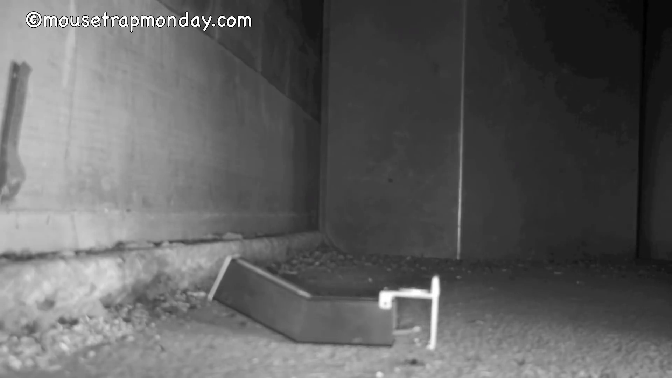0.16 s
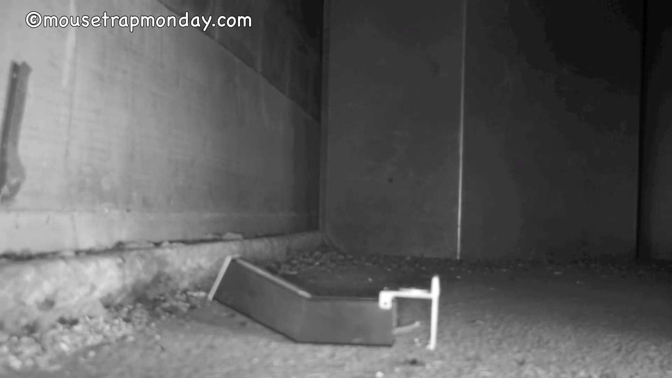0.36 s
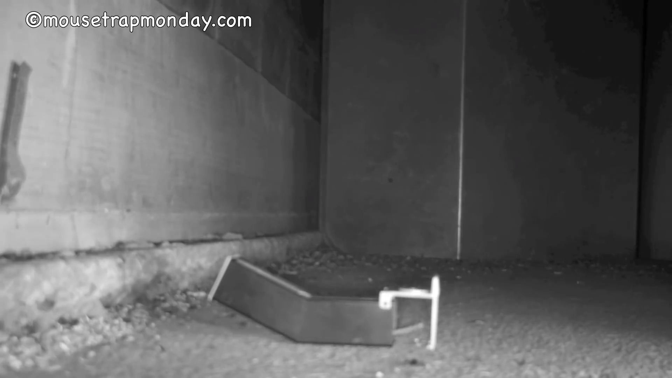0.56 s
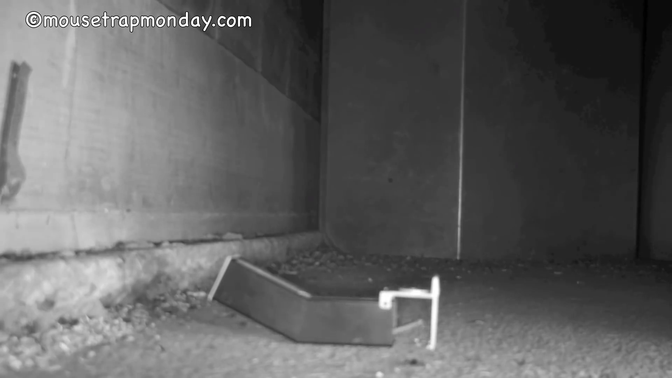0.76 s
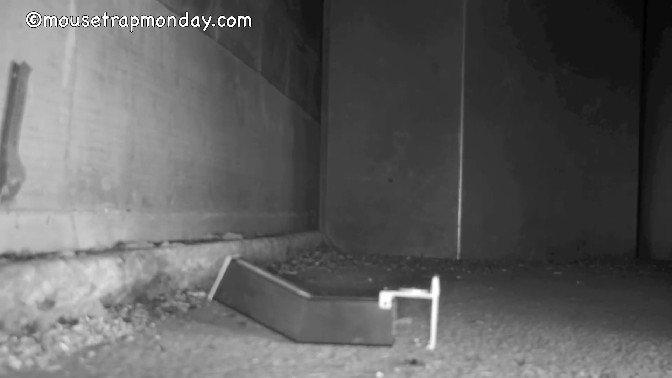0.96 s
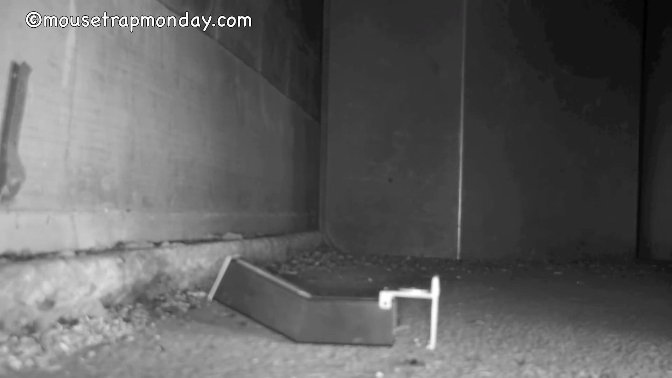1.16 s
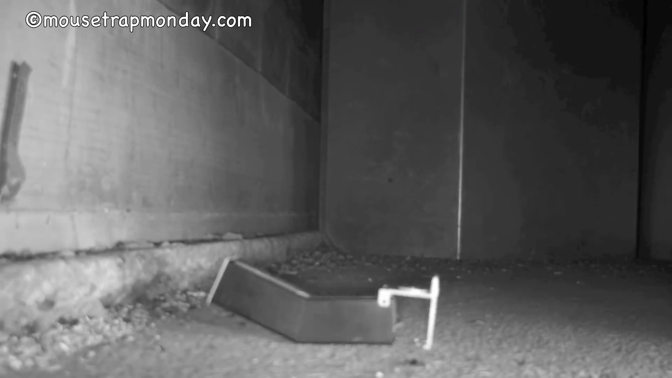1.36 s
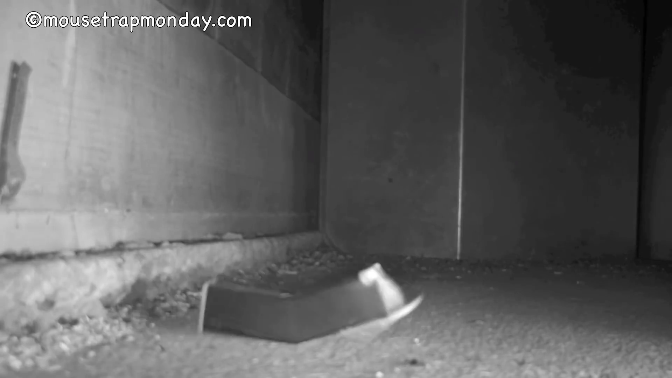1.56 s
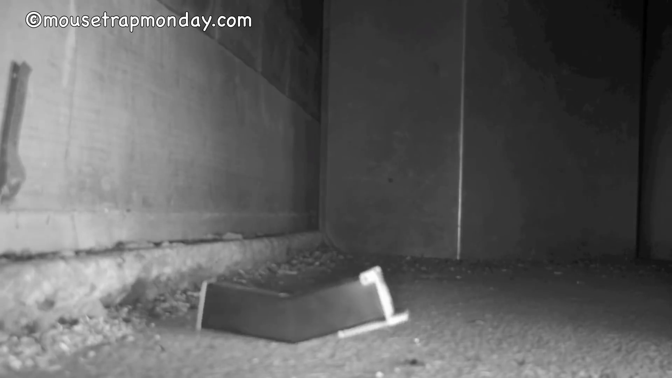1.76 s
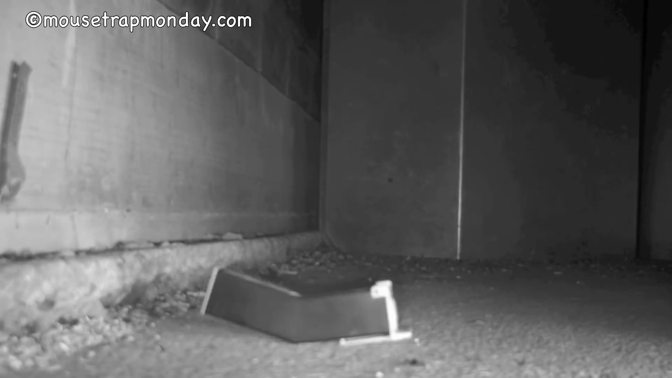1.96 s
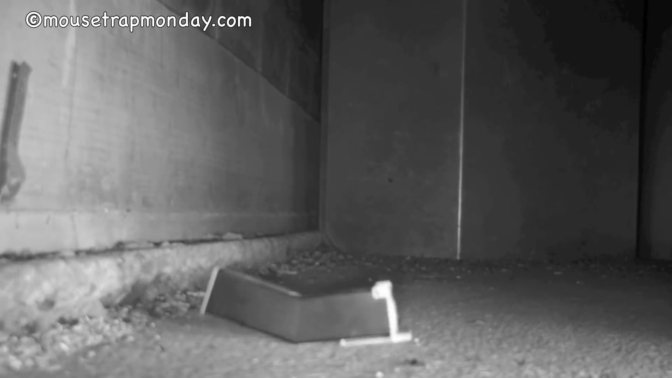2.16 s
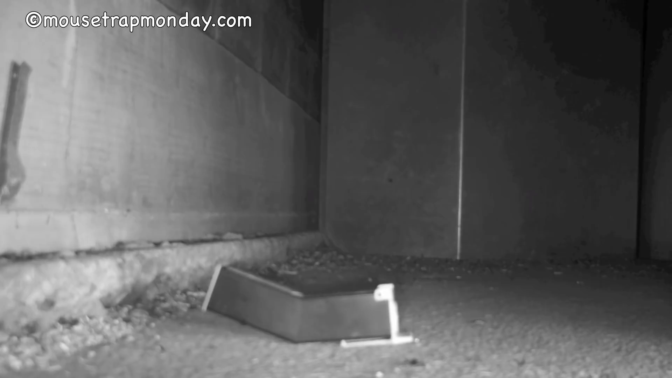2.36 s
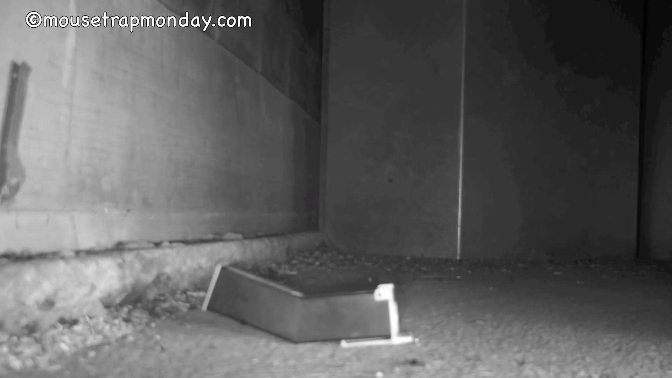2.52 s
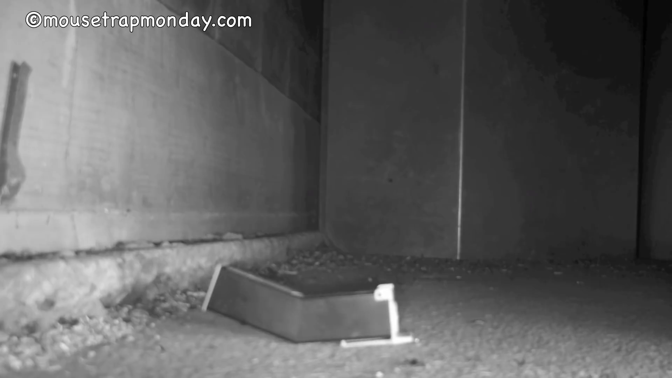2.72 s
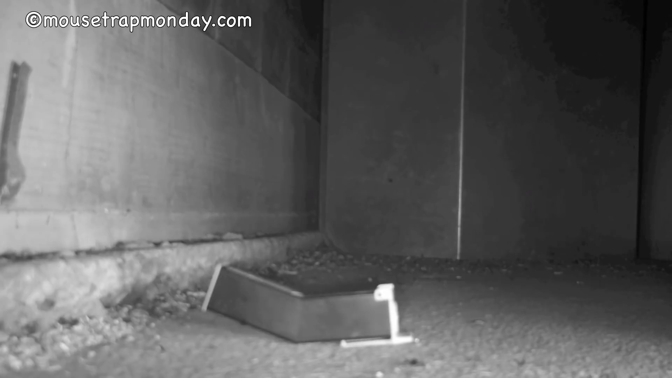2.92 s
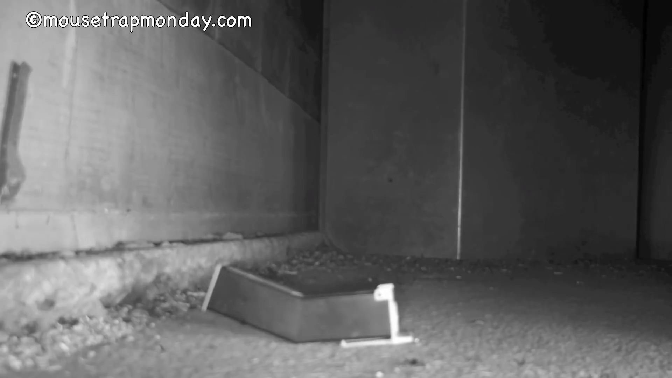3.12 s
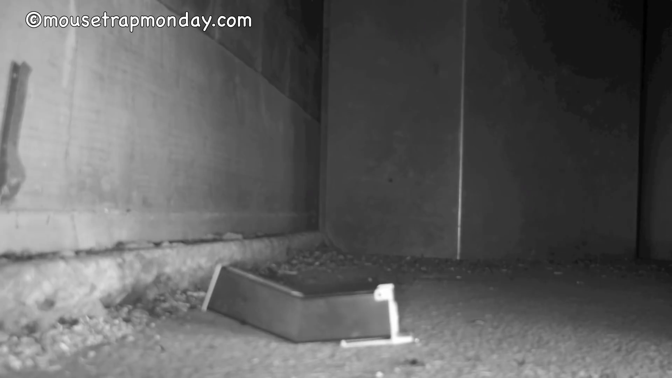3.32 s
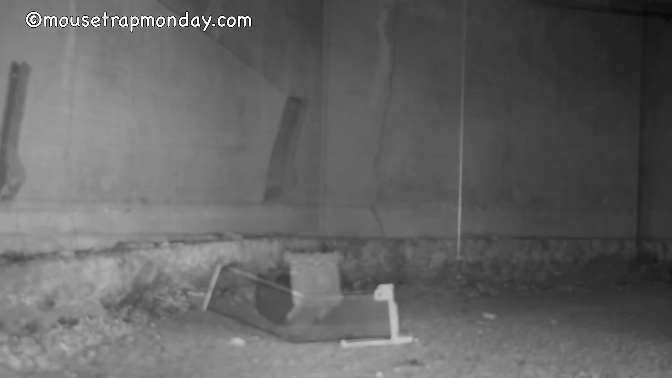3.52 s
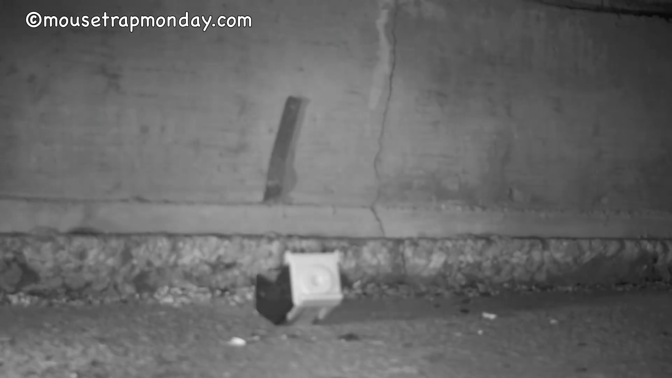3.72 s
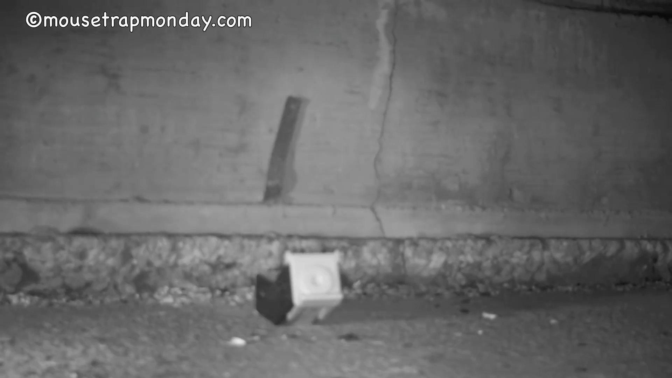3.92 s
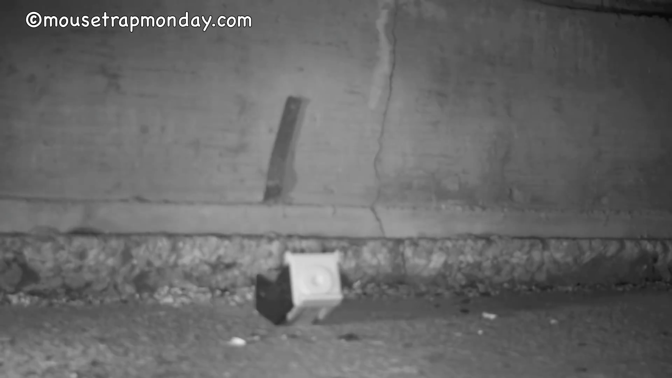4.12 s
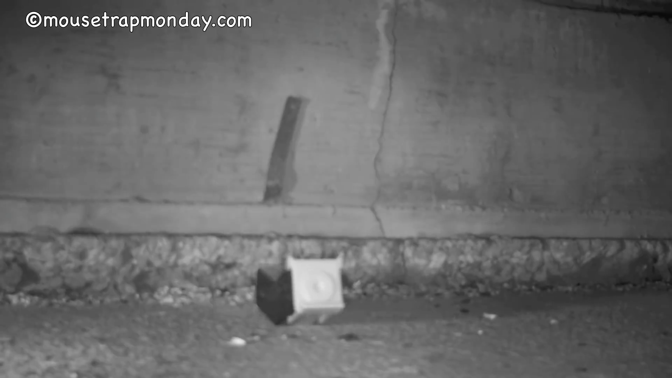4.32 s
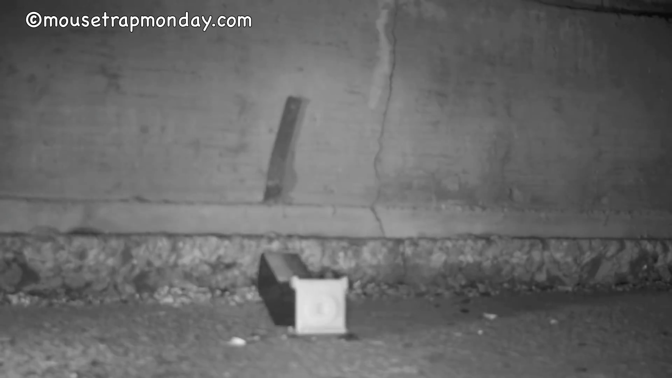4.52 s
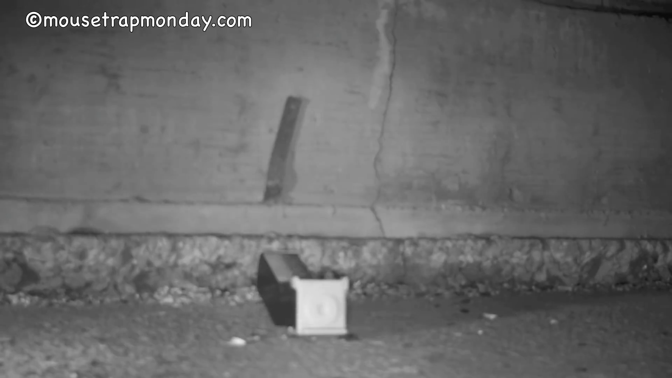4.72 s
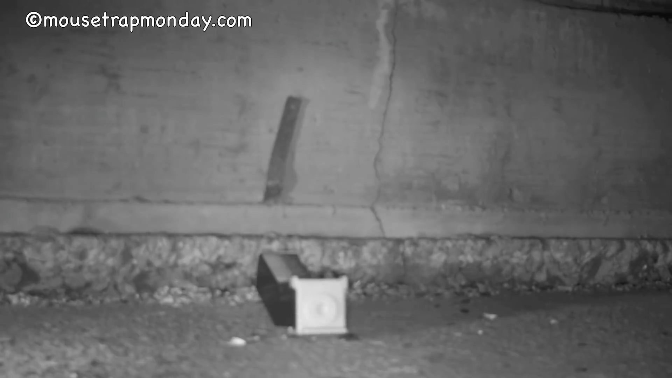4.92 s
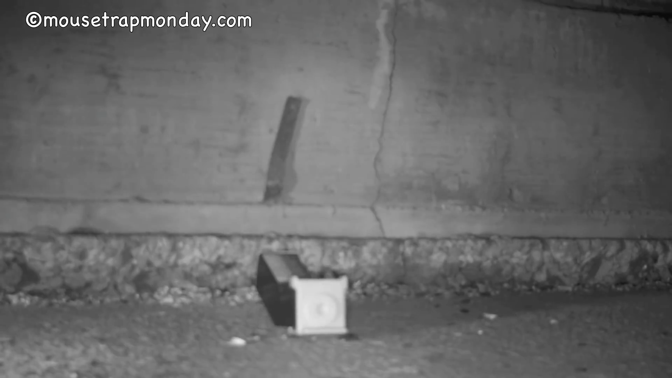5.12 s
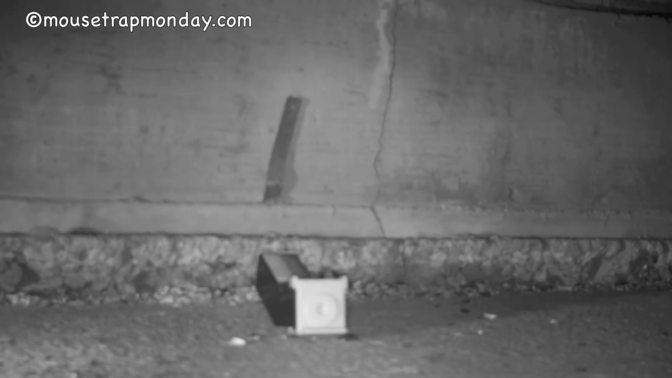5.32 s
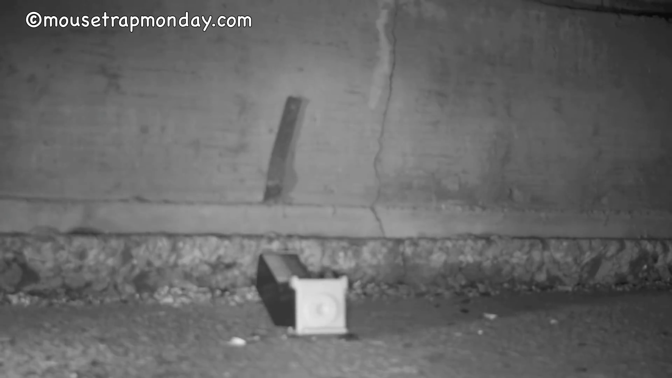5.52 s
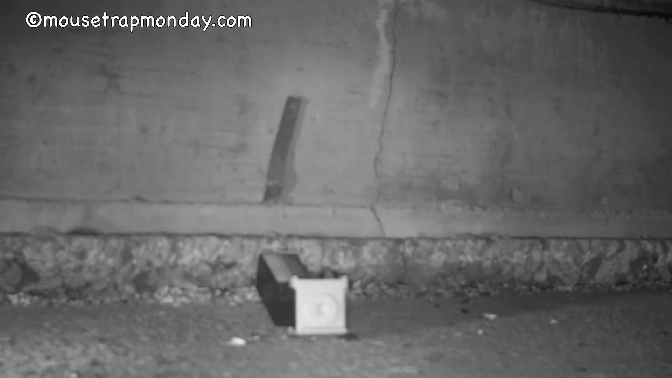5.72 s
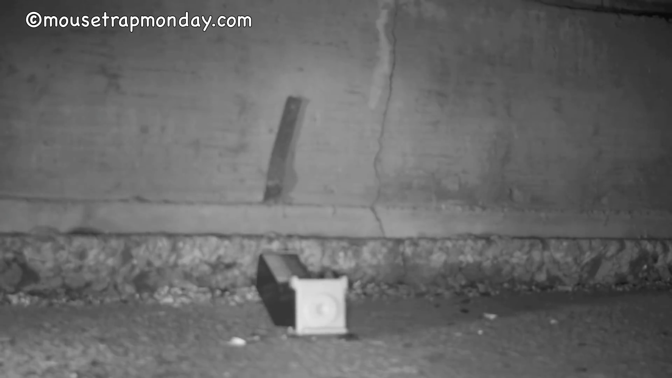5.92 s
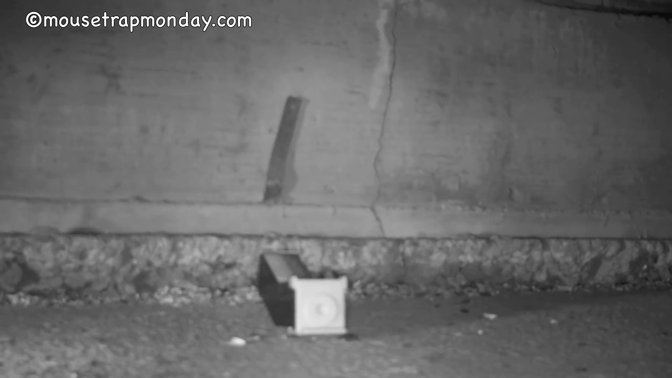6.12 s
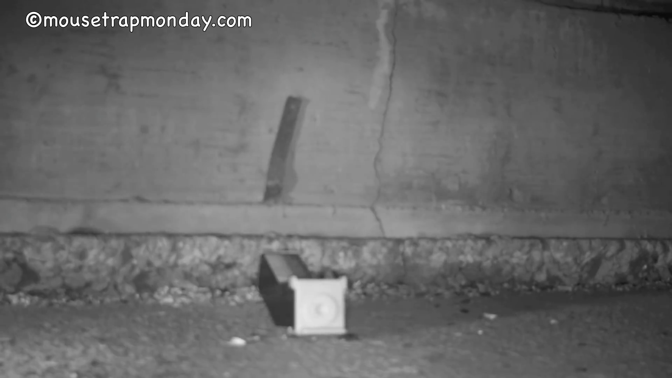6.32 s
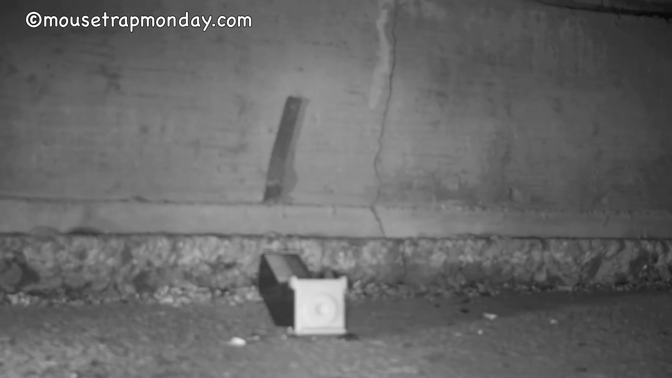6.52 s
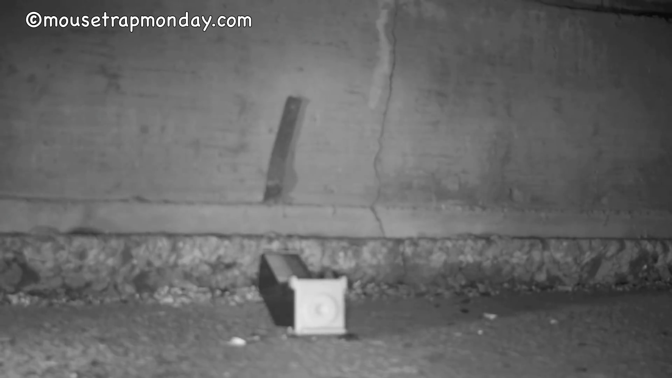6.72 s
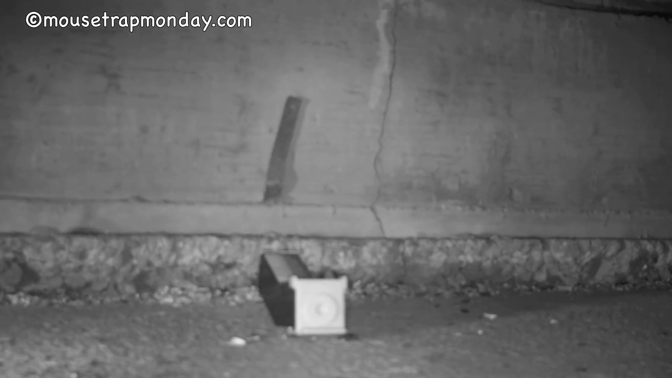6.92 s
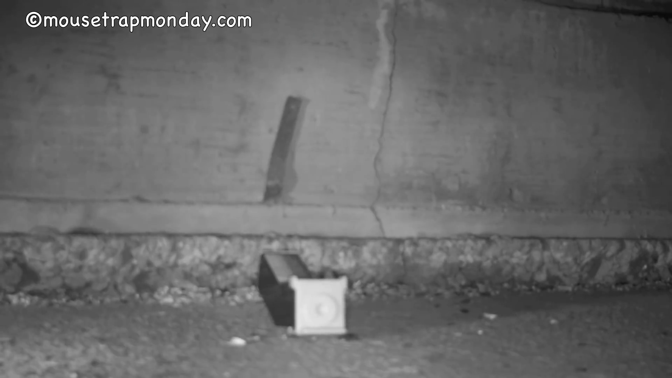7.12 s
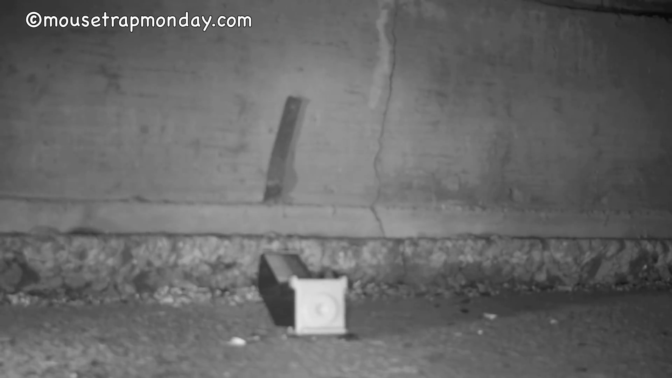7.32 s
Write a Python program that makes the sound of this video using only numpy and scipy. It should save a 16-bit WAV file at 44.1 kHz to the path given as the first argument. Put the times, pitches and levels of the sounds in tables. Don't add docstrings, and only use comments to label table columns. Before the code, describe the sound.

A plastic tube trap tips, its door scrapes and snaps shut loudly, then small knocks and faint claw ticks sound in a quiet, hissy barn.

```python
import sys
import numpy as np
from scipy import signal
from scipy.fft import rfft, irfft, next_fast_len
from scipy.io import wavfile
from scipy.ndimage import map_coordinates

SR = 44100
rng = np.random.default_rng(int(sys.argv[2]) if len(sys.argv) > 2 else 0)


def bounce(signal):
    frames = np.transpose(np.atleast_2d(signal))
    limited = np.clip(frames, -1, 1)
    pcm = np.round(limited * 32767).astype(np.int16)
    wavfile.write(sys.argv[1], SR, pcm)


def attenuation_scalar(level_db):
    decades = np.asarray(level_db, float) / 20
    return 10 ** decades


N = 325017


def unit(x):
    return x / np.sqrt(np.mean(x ** 2) + 1e-20)


def along(points, hz):
    f, value = np.transpose(points)
    return np.interp(np.log(hz + 1), np.log(f + 1), value)


def wobble(rate):
    knots = rng.standard_normal(int(N * rate / SR) + 4)
    return map_coordinates(knots, [np.arange(N) * rate / SR])


def filtered(x, response):
    m = 2 * next_fast_len(len(x) // 2 + 2048)
    return irfft(rfft(x, m) * response(np.fft.rfftfreq(m, 1 / SR)), m)[:len(x)]


def add(track, s, sound):
    part = track[round(s * SR):][:len(sound)]
    part += sound[:len(part)]


def modes(table, scatter_db=0, spread=1):
    hz, width, db = (column[:, None] for column in np.transpose(table))
    gain = attenuation_scalar(db + scatter_db * rng.standard_normal(db.shape))

    def response(f):
        damping = f * width * spread
        power = (gain * damping) ** 2 / ((hz ** 2 - f ** 2) ** 2 + damping ** 2)
        above = 1 / (1 + (f / (1.13 * hz.max())) ** 6)
        below = 1 / (1 + (0.73 * hz.min() / (f + 1)) ** 6)
        cepstrum = irfft(np.log(power.sum(0) * above * below + 1e-12))
        cepstrum[0] /= 2
        cepstrum[len(f) - 1:] = 0
        return np.exp(rfft(cepstrum))
    return response


# f/Hz, level/dB
CRACK = [(3000, -33), (7000, -1.5), (9000, 1), (11000, 2), (13000, -1), (15000, -6), (20000, -26.5)]


def knocks(contacts, hollow, wall, rim):
    direct, around = np.zeros(N), np.zeros(N)
    ms = np.arange(4096) * 1000 / SR
    click = 1.0 * (ms == ms[64])

    def crack(hz):
        return attenuation_scalar(along(CRACK, hz))

    for s, db, hollow_db, rim_db, crack_db, contact_ms in contacts:
        u = ms / np.clip(contact_ms, .3, 12)
        force = rng.standard_normal(len(ms)) * (1 - np.exp(-u / 0.067)) * np.exp(-u)
        parts = [(hollow, hollow_db, 40), (wall, 0, 25), (rim, rim_db, 9), (None, crack_db, 3)]
        for table, part_db, first_ms in parts:
            felt = force * np.exp(-ms / first_ms)
            body = crack if table is None else modes(table, scatter_db=1.0)
            ring = filtered(felt, body)
            ring = attenuation_scalar(db + part_db) * ring / np.abs(ring).max()
            blurred = filtered(click, crack if table is None else modes(table, spread=4))
            add(direct, s, ring)
            add(around, s, unit(blurred) * np.std(ring))
    return np.array([direct, around])


def touched(kind, rows):
    hollow_db, rim_db, crack_db, grows = kind
    return [(s, db, hollow_db, rim_db + hard_db, crack_db + grows * hard_db, ms)
            for s, db, hard_db, ms in rows]


# t/s, landing level/dB, hardness/dB
ROCKS = [
    (1.970, -30, 0),
    (2.261, -34.5, 3),
]
# delay t/s, level/dB, hardness/dB, contact time/ms
ONE_ROCK = [
    (0, -7.5, 0, 7),
    (.009, -8.5, -7, 14),
    (.038, 0, 5.5, 5),
    (.047, -10, -3, 7.5),
]


def rocking():
    return [(s + delay, db + part_db, hard_db + part_hard_db, ms)
            for s, db, hard_db in ROCKS
            for delay, part_db, part_hard_db, ms in ONE_ROCK]


# f/Hz, width/Hz, level/dB
SIDE_HOLLOW = [(161, 49.7, -14), (412, 46, -7), (533, 40, 0.5), (649, 55, -8), (815, 1000, -21),
               (1040, 87, -2.5), (1235, 43, -3), (1382, 35, 0.5)]
SIDE_WALL = [(1750, 89, -5), (1970, 65, -5), (2140, 120, 5), (2520, 70, 0), (2707, 110, -1),
             (2500, 1000, -17), (3550, 200, -14.5)]
SIDE_RIM = [(4170, 300, -10), (4840, 210, -6), (5300, 178, -3), (5660, 3800, -10.5), (5820, 260, 2),
            (6590, 370, -7.5)]
# t/s, wall peak level/dB, hardness/dB, contact time/ms
DRAGS = [(1.468, -33.5, 0.5, 12), (1.486, -27, -1, 5.8), (1.492, -32.5, -3, 4), (1.500, -25, 9, 2.2),
         (1.508, -28, -3, 8), (1.523, -20.5, 7, 5), (1.551, -27, -3, 5), (2.138, -49, 2, 11),
         (2.155, -47.5, 0, 6), (2.342, -52, 3, 3.2)]
# t/s, wall peak level/dB, hardness/dB, contact time/ms
BLOWS = [
    (1.366, -53.5, -7, 7.6),
    (1.459, -44, -6, 4),
    (1.582, -22, -3, 4.7),
    (1.591, -30.5, -7, 4.9),
    (1.6612, -5, 5, 4.2),
    (1.670, -17.5, -1, 3.6),
    (1.691, -22, 3, 7.2),
    (1.702, -21, -2, 7.2),
    (1.744, -25, 6, 4.9),
]


def side_knocks():
    # hollow/dB, rim/dB, crack/dB, crack gained per dB of hardness
    drag, blow, rock = (-22.5, -8, -29, 1.2), (-10, -4.5, -13.5, 1.73), (-4.5, -9.5, -22, 2)
    contacts = touched(drag, DRAGS) + touched(blow, BLOWS) + touched(rock, rocking())
    return knocks(contacts, SIDE_HOLLOW, SIDE_WALL, SIDE_RIM)


# f/Hz, width/Hz, level/dB
END_HOLLOW = [(290, 46, 1.5), (460, 90, 3), (620, 71, -4.5), (810, 1200, -9), (1084, 74, 0.5),
              (1250, 120, 0), (1540, 37, 2.5)]
END_RIM = [(4050, 71, -8.5), (5060, 160, 1.5), (5000, 6900, -9.5), (5730, 570, 0), (5980, 230, 4.5),
           (6860, 560, -13)]
FOOT = [(1510, 120, -4), (2050, 160, 5.5), (2580, 110, 5), (2900, 1000, -3.5), (2980, 300, -9),
        (3480, 470, -3.5)]
# t/s, wall peak level/dB, hardness/dB, contact time/ms
THUDS = [
    (4.404, -48, -4, 8.1),
    (4.421, -43.5, 4, 7.6),
    (4.456, -42, -2, 5.9),
    (4.630, -42, 0, 6),
    (4.680, -46, -2, 14),
]
# t/s, wall peak level/dB, hardness/dB, contact time/ms
LANDINGS = [
    (4.410, -27, -2, 3.2),
    (4.413, -27.5, 1, 3),
    (4.452, -35, 2.5, 1.5),
    (4.477, -36, 6.5, 3.5),
    (4.635, -34.5, -6, 6),
]


def foot_knocks():
    # hollow/dB, rim/dB, crack/dB, crack gained per dB of hardness
    thud, landing = (3.5, -6, -27, 1.1), (-6.5, -2.5, -14.5, 2.1)
    return knocks(touched(thud, THUDS) + touched(landing, LANDINGS), END_HOLLOW, FOOT, END_RIM)


# f/Hz, width/Hz, level/dB
END_WALL = [(1715, 57, -4), (1972, 40, 0), (2280, 88, -5.5), (2500, 83, -1), (2750, 170, 0),
            (2500, 1500, -18), (3580, 200, -29)]
# t/s, wall peak level/dB, hardness/dB, contact time/ms
CLAWS = [(4.157, -54.5, 0, 3), (5.363, -49, -2, 3.3), (5.403, -33.5, 1.5, 5.8), (5.456, -39.5, 3, 1.5),
         (5.484, -29.5, -1.5, 3.4), (5.510, -46, -8, 6), (5.564, -45.5, 4, 4.4), (6.040, -44, 2, 2.6),
         (6.164, -44, 1, 3.4), (6.170, -40, 3.5, 2.9), (6.899, -50, 0, 4), (6.938, -37, -4, 1.7),
         (6.951, -50, 7, 6), (6.979, -49, -1, 4), (6.997, -29.5, 4, 3.4)]
# t/s, wall peak level/dB, hardness/dB, contact time/ms
BUMPS = [
    (6.993, -37, 2.5, 3),
    (7.333, -39, 1.5, 3.7),
    (7.343, -34.5, -3, 3.4),
]


def claw_knocks():
    # hollow/dB, rim/dB, crack/dB, crack gained per dB of hardness
    claw, bump = (-23, -9, -18, 1.5), (-8, -8.5, -11.5, 1.6)
    return knocks(touched(claw, CLAWS) + touched(bump, BUMPS), END_HOLLOW, END_WALL, END_RIM)


def swells(rows, unsteady):
    track, t = np.zeros(N), np.arange(SR // 2) / SR
    for s, db, hz, swell_ms in rows:
        u = t * 1000 / swell_ms
        drift = np.cumsum(rng.standard_normal(len(t))) * unsteady
        swell = (u * np.exp(1 - u)) ** 2
        add(track, s, attenuation_scalar(db) * swell * np.sin(2 * np.pi * hz * t + drift))
    return track


# t/s, peak level/dB, f/Hz, swell time/ms
SUNG = [(1.492, -36, 1380, 16.4), (1.553, -38.5, 1368, 4.7), (1.49, -45, 528, 26), (1.582, -41, 535, 13.4),
        (1.662, -11.5, 2510, 4.9), (1.668, -20, 2150, 3.6), (1.696, -24.5, 2133, 5.5),
        (1.670, -27, 520, 6.5), (1.690, -26, 1380, 7.4), (2.272, -47, 382, 8.3), (2.300, -48.5, 375, 7),
        (1.661, -33, 165, 6)]


def singing_door():
    return swells(SUNG, unsteady=0.019)


# t/s, peak level/dB, f/Hz, swell time/ms
SQUEAKS = [
    (1.976, -35.5, 6030, 3.9),
    (2.271, -41.5, 6050, 4),
    (2.299, -32, 6050, 1.65),
    (1.744, -27, 5950, 2.3),
]


def squeaking_pivot():
    return swells(SQUEAKS, unsteady=.045)


# t/s, peak level/dB, f/Hz, swell time/ms
TAPS = [(1.066, -55.5, 2600, 1.2), (3.270, -52, 2470, 1.8), (3.892, -54.5, 2710, 1.6),
        (5.918, -52.5, 2730, 2.6), (5.937, -57, 2750, 1.4), (6.010, -58, 2900, 1.8),
        (6.112, -59, 2750, 2.7), (6.889, -49, 2750, 1.6), (6.897, -47, 2790, 1.8), (6.905, -47, 2700, 1.6)]


def claw_taps():
    return swells(TAPS, unsteady=.09)


# t/s, peak level/dB, f/Hz, swell time/ms
RINGS = [
    (4.681, -50, 1200, 6),
    (4.64, -52, 2030, 10),
    (5.408, -55, 1985, 12),
    (5.49, -51, 1985, 18),
    (6.998, -47, 1730, 8),
]


def wall_rings():
    return swells(RINGS, unsteady=.05)


# start t/s, attack t/s, hold t/s, release t/s, level/dB
STROKES = [(1.329, 0.11, 0.012, 0.011, -58.5), (1.452, .015, 0.2, .01, -50.5), (1.47, 0.039, .01, .05, -51),
           (1.6, .05, .01, .01, -49.5), (4.42, 0.046, 0.009, 0.057, -53.5), (4.61, .04, .02, .12, -59.5),
           (5.35, .09, .08, 0.29, -65.5), (5.797, 0.24, .05, 0.41, -71), (6.82, 0.16, 0.053, .06, -66),
           (7.25, 0.053, 0.11, .01, -63.5)]


def strokes():
    t, gain, edge_db = np.arange(N) / SR, np.zeros(N), -16
    for *times, db in STROKES:
        start, *spans = times
        corners = np.cumsum([start, *np.abs(spans)])
        shape_db = np.interp(t, corners, [edge_db, 0, 0, edge_db], left=-150, right=-150)
        gain += attenuation_scalar(db + shape_db)
    return gain


def rubbing():
    grit = rng.standard_normal(N) * attenuation_scalar(3.4 * wobble(200) + 2.5 * wobble(30))

    def ring(hollow, wall, rim):
        walls = unit(filtered(grit, modes(wall)))
        air = attenuation_scalar(-4.5) * unit(filtered(grit, modes(hollow)))
        return walls + air + attenuation_scalar(-7.5) * unit(filtered(grit, modes(rim, spread=2.5)))

    from_side = ring(SIDE_HOLLOW, SIDE_WALL, SIDE_RIM)
    from_end = ring(END_HOLLOW, END_WALL, END_RIM)
    side_view = np.arange(N) < 3.6 * SR
    return strokes() * np.where(side_view, from_side, from_end)


# f/Hz, t60/s
BARN = [(150, 0.63), (500, 1), (2000, 0.73), (6000, 0.54), (12000, 0.3)]
# f/Hz, level/dB
BARN_COLOUR = [(100, -8), (400, 3.5), (800, -2.5), (2000, -5.5), (3200, -5.5), (4200, 3), (5500, -6),
               (9000, 0), (14000, -1)]


def answer(x, delay, share):
    hz, t, z = signal.stft(rng.standard_normal(SR), SR, nperseg=256)
    colour_db = along(BARN_COLOUR, hz)[:, None]
    t60 = share * along(BARN, hz)[:, None]
    tail = signal.istft(z * attenuation_scalar(colour_db - 60 * t / t60), SR, nperseg=256)[1]
    late = np.pad(x, (round(delay * SR), 0))
    return signal.fftconvolve(late, tail / np.linalg.norm(tail))[:N]


# t/s, peak level/dB, f/Hz, swell time/ms
CREAKS = [
    (1.40, -59, 910, 20),
    (3.78, -58, 244.3, 75),
    (5.62, -57, 136.1, 140),
]


def creaking_timbers():
    return swells(CREAKS, unsteady=0.018)


# rumble level/dB, air level/dB, hiss level/dB, whine level/dB
STRETCHES = [
    (-60.5, -65.5, -71, -76),
    (-59.5, -61.5, -70, -75.5),
    (-62, -63, -70.5, -75),
]


def faded():
    t = np.arange(N) / SR
    fade_starts, fade_s = [3.38, 6.0], 0.49
    into = [np.ones(N)] + [np.clip((t - s) / fade_s, 0, 1) for s in fade_starts] + [np.zeros(N)]
    share = -np.diff(into, axis=0)
    return np.sqrt(attenuation_scalar(np.transpose(STRETCHES)) ** 2 @ share ** 2)


def hush(spectrum):
    return unit(filtered(rng.standard_normal(N), lambda hz: attenuation_scalar(along(spectrum, hz))))


# f/Hz, level/dB per Hz
RUMBLE = [(8, -16.5), (25, 1), (45, -4.5), (63, 2), (85, -4.5), (110, -5.5), (165, -14.5), (250, -18.5),
          (400, -50), (600, -120)]
# f/Hz, level/dB per Hz
AIR = [(88, -21.5), (150, -2.5), (252, -5.5), (385, -7.5), (438, -8.5), (693, -9.5), (2500, -21),
       (3250, -47.5), (5500, -120)]
# f/Hz, level/dB per Hz
HISS = [(1200, -36), (2500, 1.5), (5000, -1), (7000, -2.5), (10500, -3.5), (11700, -3), (12600, -4),
        (15000, -5.5), (17000, -4)]
# t/s, level/dB, width t/s
DRAUGHTS = [
    (3.9, 1.5, .08),
    (4.8, 2, 0.13),
    (6.0, 2.5, 0.087),
    (6.7, 0.9, .12),
]


def night():
    t = np.arange(N) / SR
    rumble, air, hiss, whine = faded()
    stir_db = sum(db * np.exp(-((t - s) / width) ** 2) for s, db, width in DRAUGHTS)
    rumble = rumble * attenuation_scalar(1.5 + .6 * stir_db + .8 * wobble(2.4)) * hush(RUMBLE)
    air = air * attenuation_scalar(1.5 + stir_db + 1.0 * wobble(6)) * hush(AIR)
    hiss = hiss * attenuation_scalar(4.5) * hush(HISS)
    whine = whine * attenuation_scalar(6) * np.sin(2 * np.pi * 7867.3 * t)
    return rumble + air + hiss + whine


def scene():
    side, side_around = side_knocks()
    foot, foot_around = foot_knocks()
    claws, claws_around = claw_knocks()
    sung = singing_door()
    trap = side + foot + claws + sung + rubbing() + claw_taps()
    around = side_around + foot_around + 0.91 * claws_around
    stone = attenuation_scalar(-11) * answer(trap, delay=.003, share=.15)
    stone += attenuation_scalar(-15.0) * answer(around, delay=.003, share=.15)
    barn = attenuation_scalar(-11) * answer(side_around + .3 * sung, delay=.012, share=1.0)
    barn += attenuation_scalar(-10.5) * answer(foot_around + 0.95 * claws, delay=.012, share=1.0)
    near = trap + squeaking_pivot() + wall_rings()
    return (near + stone + barn + creaking_timbers() + night())[None]


def roll_off(x):
    return signal.sosfilt(signal.butter(12, 16430, fs=SR, output="sos"), x)


def record(dry):
    top_hz, edge_hz, full_level = 15400, 200, 0.18

    def below(hz):
        return np.clip((top_hz - hz) / edge_hz + .5, 0, 1)

    def edge(hz):
        return np.maximum(below(hz - edge_hz), attenuation_scalar(-11)) * (hz < 16400)

    heard = filtered(dry[0], below)
    clipped = heard / (1 + np.abs(heard / full_level) ** 8) ** (1 / 8)
    mix = filtered(clipped, edge)[None]
    return roll_off(mix)


dry = scene()
out = record(dry)
bounce(out)
```